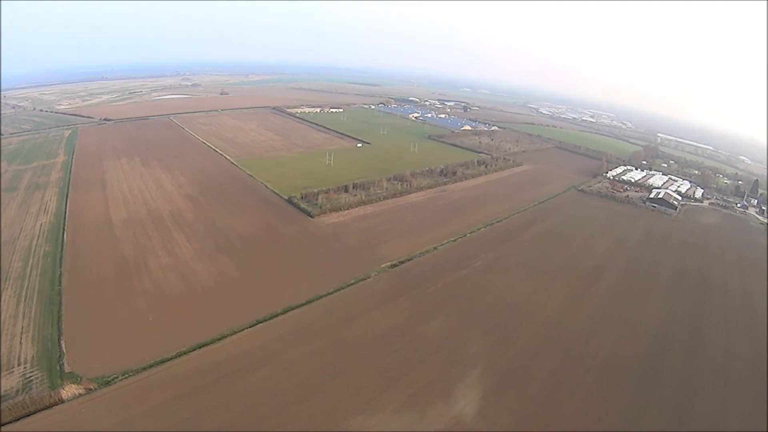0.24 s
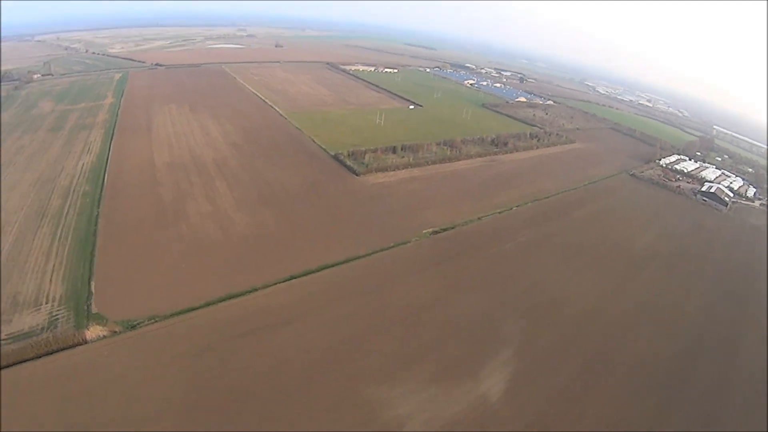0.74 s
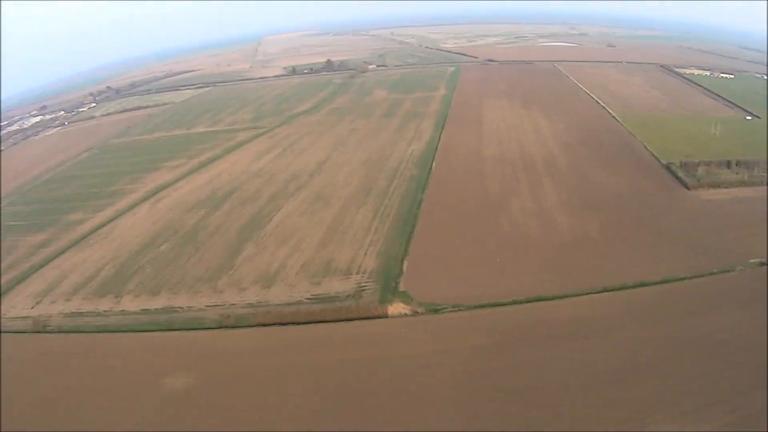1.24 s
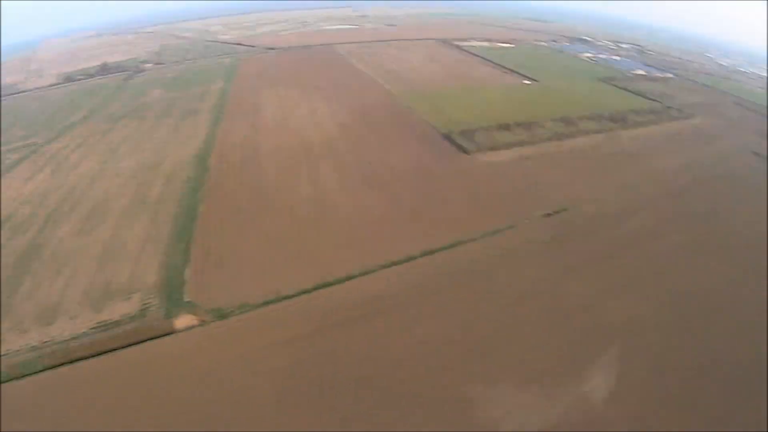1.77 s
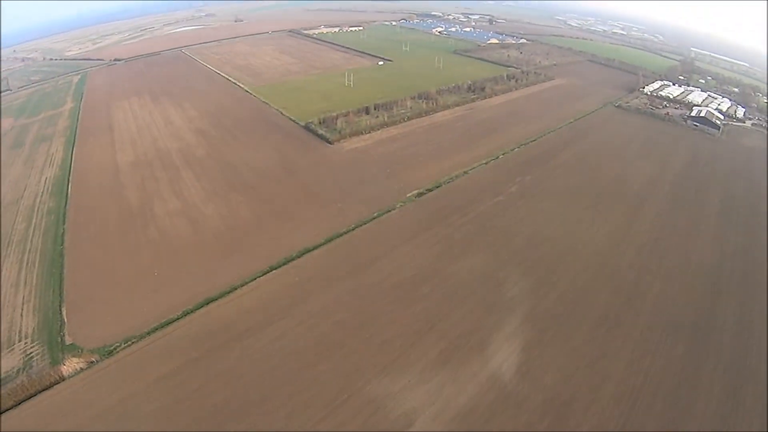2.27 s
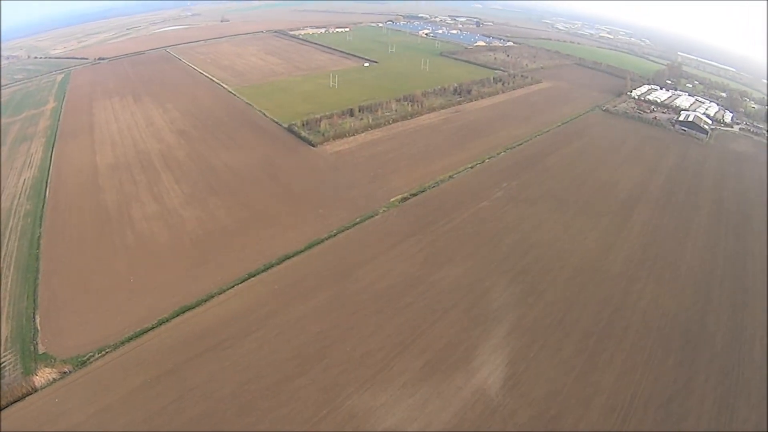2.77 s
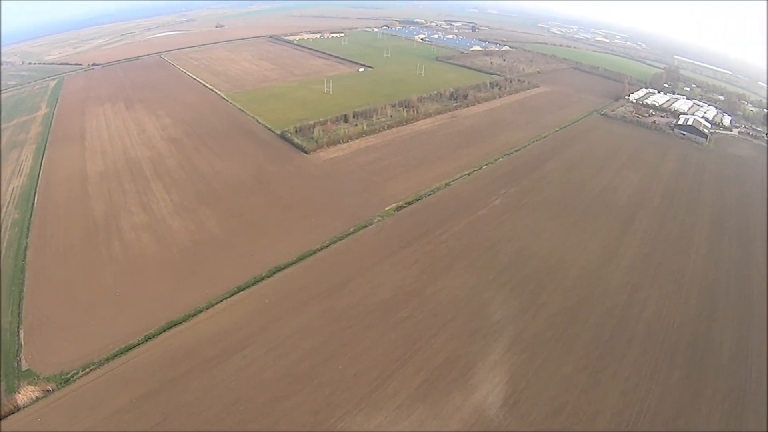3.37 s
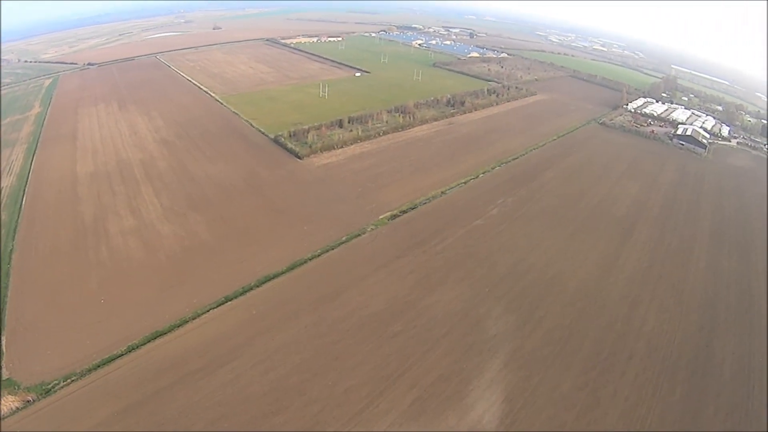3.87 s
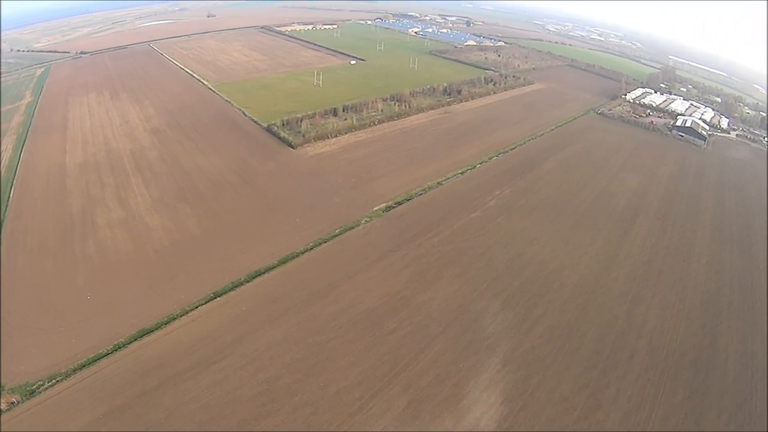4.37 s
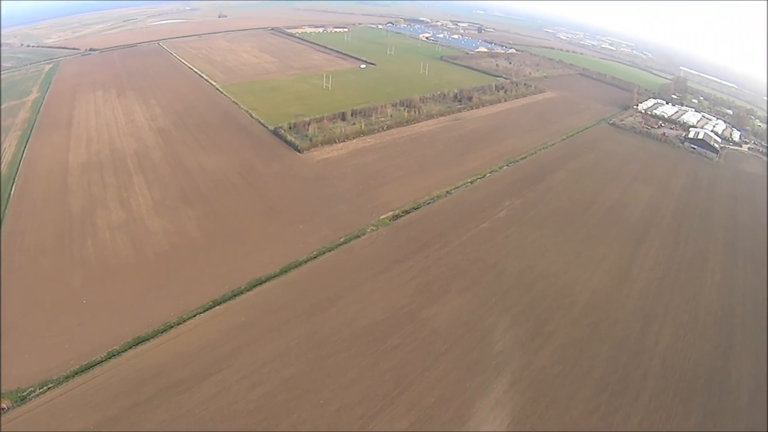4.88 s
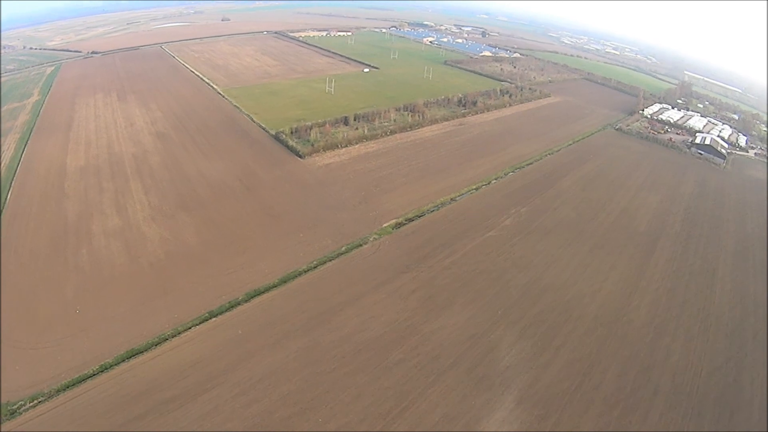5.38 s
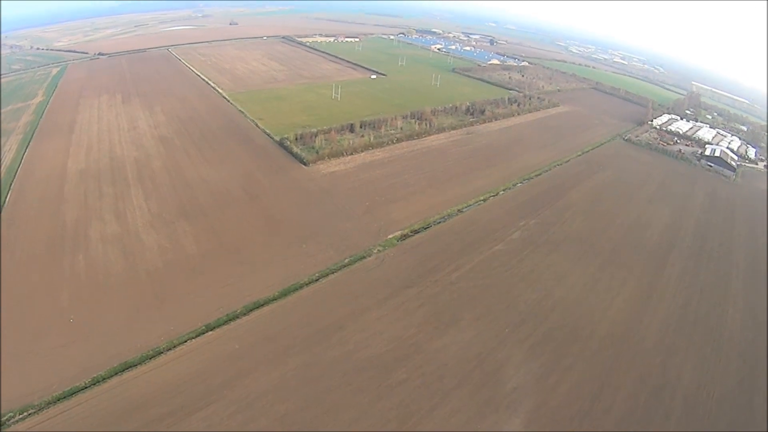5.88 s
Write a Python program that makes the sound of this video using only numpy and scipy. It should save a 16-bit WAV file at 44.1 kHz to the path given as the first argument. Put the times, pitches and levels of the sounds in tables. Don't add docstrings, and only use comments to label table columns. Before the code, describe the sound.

Continuous loud engine drone from an airborne paraglider, close and coloured by a sealed camera case, in wide stereo. Propeller blades chop the air rapidly into buzzing wash, midrange roar and a softer hiss. Early on, a quick head turn lets blade slap and airy hiss through, with humming wind thumps. Facing ahead again, the motor settles a touch lower and runs on without stopping.

```python
import sys
import numpy as np
from scipy import signal
from scipy.fft import rfft, irfft, next_fast_len
from scipy.io import wavfile
from scipy.ndimage import uniform_filter1d, map_coordinates

SR = 44100
rng = np.random.default_rng(int(sys.argv[2]) if len(sys.argv) > 2 else 0)


def invert_db(x):
    u = np.asarray(x, float) / 20
    return 10 ** u


def inscribe(sig):
    pcm = np.round(np.clip(np.atleast_2d(sig).T, -1, 1) * 32767)
    wavfile.write(sys.argv[1], SR, pcm.astype(np.int16))


N = 269892

# time_s, speed_turns_per_s
SHAFT_SPEED = [(0.0, 21.545), (0.4, 21.58), (0.8, 21.648), (1.0, 21.653), (1.2, 21.614), (1.9, 21.618),
               (2.2, 21.686), (2.4, 21.708), (2.8, 21.566), (3.2, 21.456), (3.4, 21.329), (4.0, 20.932),
               (4.2, 20.88), (4.6, 20.868), (5.6, 20.62), (5.8, 20.628), (6.2, 20.668)]
# pitch_hz, left_db,
# right_db, likeness_0_to_1 of the two sides, right_lead_radians
HOUSING_PASS_BELOW_1K = [(30, -68.5, -69, 0.85, 0.5), (70, -61, -60, 0.93, -0.0), (142, -54, -51.5, 0.89, 0.41),
                         (233, -58, -57.5, 0.59, 0.26), (334, -46.5, -52.5, 0.24, 2.5), (428, -54, -61.5, 0.76, -0.4),
                         (485.5, -61, -54.0, 0.33, 0.6), (552, -44, -45.5, 0.79, 0.2), (593, -48, -42.5, 0.78, 1),
                         (615, -49, -47, 0.81, 0.87), (693, -55.5, -46, 0.34, 1.1), (794, -60.5, -50.5, 0.5, -0.2),
                         (880, -58, -53, 0.77, -1.5), (978, -53, -47, 0.64, -0.8)]
HOUSING_PASS_1K_TO_3K = [(1014, -48.5, -55, 0.76, -2), (1140, -51, -49.5, 0.97, -1.5), (1290, -50, -48.5, 0.78, -2),
                         (1399, -56.5, -55, 0.31, 2.5), (1516, -42, -41, 0.84, 0.76), (1677, -44, -46.5, 0.94, -0.3),
                         (1735, -41, -43, 0.81, -0.46), (1847, -48.5, -50, 1, -1), (2085, -53.5, -73, 0.8, -1),
                         (2187, -55, -53, 0.23, -0.77), (2440, -56.5, -64.5, 0.21, -1.1),
                         (2570, -56.5, -70.5, 0.34, 4.5), (3030, -57, -56.5, 0.53, -2.5),
                         (3230, -56.5, -57.0, 0.27, -3)]
HOUSING_PASS_3K_TO_8K = [(3445, -61.5, -58, 0.52, 4), (3670, -67.5, -63.5, 0.6, 3.5), (3870, -66.5, -66.5, 0.69, 4),
                         (4340, -61, -63.5, 0.8, -3.5), (4740, -77, -68, 1, 0.4), (5064, -63.5, -60.5, 0.74, 1),
                         (5030, -72.5, -63, 0.97, 1), (5360, -62.5, -62.5, 0.96, -1), (5890, -74, -68.5, 0.2, 2),
                         (6060, -68.5, -68.5, 0.63, 0.6), (6680, -85, -73, 0.35, 0), (6800, -73, -69.5, 0.27, 1),
                         (7500, -71, -72, 0.33, -0.1), (8360, -79, -78, 0.14, 0.2)]
HOUSING_PASS_ABOVE_8K = [(8450, -76, -74, 0.13, -0.5), (8700, -79, -80.5, 0.29, 1.2), (9260, -76.5, -83, 0.25, 2),
                         (10030, -83.5, -90.5, 0.19, -1), (10320, -86, -81.5, 0.29, -0.8),
                         (10800, -89.5, -93.5, 0.13, -2), (11000, -100, -100.0, 0.09, -1)]
# order_per_shaft_turn, level_db over the noise
BLADE_TONES = [(1, 14), (2, 12.5), (4, 16.5), (6, 10.5), (8, 0.5), (10, 9), (12, 3.5), (14, 5), (16, 11),
               (18, 5.5), (20, -0.5), (22, 14.5), (24, 5.5), (26, 9.5), (28, 9.5), (30, 10), (32, 11),
               (34, 8), (36, 4)]
# order_per_crank_turn, level_db over the noise
CRANK_TONES = [(1, 11.5), (14, 6.5), (15, -0.5), (27, 6), (28, 8), (29, 9), (30, 6), (31, 5), (56, 7)]
# pitch_hz, width_hz, left_db, right_db over the range around
HOUSING_RINGS = [(346.3, 12, 3.5, 6), (574.4, 17.3, -2, 0), (1119, 19, 3.5, 1.5), (2410, 64, -1, 3),
                 (2948, 30, 2.5, 4), (3110, 30, 0.5, 5.5), (3140, 10, 2.5, 0.5), (3430, 19, -3, 3),
                 (4956, 40, 2.5, 2.5), (5030, 28, -4.5, 2.5)]
# time_s, level_db about its usual strength
AIRFLOW_LEVEL = [(0.2, 0.5), (0.8, 0.54), (2.2, 0), (2.5, 0.1), (3.07, -1.5), (3.8, -0.3), (4.35, 0.85),
                 (5.3, 0.3), (5.75, 0.8), (6.1, -0.5)]
# time_s, share_0_to_1
HEAD_TURN = [
    (0.9, 0.0),
    (1.1, 0.2),
    (1.4, 0.97),
    (1.75, 0.9),
    (1.98, 0.15),
    (2.15, 0.07),
]
# middle_s, length_s, level_db, pitch_hz
WIND_PUFFS = [
    (1.13, .08, -35, 172),
    (1.194, .04, -25, 173.8),
    (1.251, .06, -24.5, 212),
    (1.341, .11, -26.5, 190.3),
    (1.47, .1, -33.5, 172.2),
    (1.552, .03, -22, 164.9),
    (1.605, .02, -29, 178),
    (1.668, 0.041, -22.5, 154.7),
    (1.757, .04, -23, 180.9),
    (1.876, 0.071, -28, 201),
]


def unit(x):
    return x / np.sqrt(np.mean(x ** 2) + 1e-20)


def curves(rows):
    s, *cols = np.transpose(rows)
    return [np.interp(np.arange(N) / SR, s, c) for c in cols]


def wobble(rate, channels=1):
    knots = rng.standard_normal((channels, int(N * rate / SR) + 4))
    return np.array([map_coordinates(k, [np.arange(N) * rate / SR]) for k in knots])


def filtered(x, response):
    m = next_fast_len(N + 8192)
    return irfft(rfft(x, m) * response(np.fft.rfftfreq(m, 1 / SR)), m)[..., :N]


def turbulence(patchy_db):
    z = signal.stft(rng.standard_normal((3, N + 512)), nperseg=256)[2]
    field = rng.standard_normal(z.shape[1:])
    field = uniform_filter1d(field, size=4, axis=0)
    field = uniform_filter1d(field, size=12, axis=1)
    noise = signal.istft(z * invert_db(patchy_db * unit(field)), nperseg=256)[1]
    return unit(noise[:, :N])


def housing(drive, lo_hz, hi_hz):
    hz, left, right, alike, lead = np.transpose(HOUSING_PASS_BELOW_1K + HOUSING_PASS_1K_TO_3K + HOUSING_PASS_3K_TO_8K + HOUSING_PASS_ABOVE_8K)

    def response(f):
        read = lambda v: np.interp(np.log(f + 1), np.log(hz), v)
        low_edge = 1 + (lo_hz / (f + 1)) ** 12
        high_edge = 1 + (f / hi_hz) ** 12
        fade = np.sqrt(1 / low_edge / high_edge)
        ring = sum(invert_db([[l_db], [r_db]]) ** 2 / (1 + (2 * (f - c) / w) ** 2)
                   for c, w, l_db, r_db in HOUSING_RINGS)
        gl, gr = fade * invert_db([read(left), read(right)]) * np.sqrt(1 + ring)
        share = np.clip(read(alike), 0, 1)
        shift = np.exp(1j * read(np.unwrap(lead)))
        common, own = share ** .5, (1 - share) ** .5
        return np.array([gl * common, gr * common * shift, gl * own, gr * own])

    parts = filtered(drive[[0, 0, 1, 2]], response)
    return parts[:2] + parts[2:]


def chop(turns, sharp):
    bump = np.exp(sharp * np.cos(2 * np.pi * turns))
    return unit(bump - bump.mean())


def blades(shaft, angle, sharp):
    return chop(2 * (shaft - angle), sharp)


def spars(shaft, angle):
    return chop(4 * (shaft - angle), sharp=0.3)


def firing(shaft, angle):
    return chop(2.7 * shaft - angle, sharp=1.0)


def uneven(shaft):
    return chop(shaft - .08, sharp=0.96)


def follow(flow_db, turn, per_db, turned_db):
    return per_db * flow_db + turned_db * turn


def steady(flow_db, turn, per_db, turned_db):
    level = follow(flow_db, turn, per_db, turned_db)
    return invert_db(level - level.mean())


def tones(turns, orders, waver_db, slip):
    out = np.zeros(N)
    for k, db in orders:
        sway, drift = wobble(1.5, channels=2)
        angle = 2 * np.pi * (k * turns + rng.random()) + slip * drift
        out += invert_db(db + waver_db * sway) * np.sin(angle)
    return out * np.sqrt(8 / SR)


def motor_tones(shaft, flow_db, turn):
    blade_db = -0.4 + follow(flow_db, turn, per_db=1.5, turned_db=-1.2)
    crank_db = 1.1 + follow(flow_db, turn, per_db=0.3, turned_db=5.2)
    lines = invert_db(blade_db) * tones(shaft, BLADE_TONES, waver_db=1.0, slip=0.46)
    lines += invert_db(crank_db) * tones(2.7 * shaft, CRANK_TONES, waver_db=1.5, slip=0.62)
    return [[1], [0], [0]] * lines


def propeller_wash(shaft, flow_db, turn, lines):
    throb_db = 1.1 * blades(shaft, 0.1, sharp=1.7) + 0.27 * wobble(9)
    wash = turbulence(patchy_db=0.47) * invert_db(throb_db)
    gain = steady(flow_db, turn, per_db=0.69, turned_db=-0.25)
    return gain * housing(unit(wash) + lines, lo_hz=18, hi_hz=490)


def shell_drumming(shaft, lines):
    throb_db = 2.3 * spars(shaft, 0.18) + 1.4 * blades(shaft, 0.46, sharp=1.2)
    drum = turbulence(patchy_db=0.36) * invert_db(throb_db)
    return housing(unit(drum) + lines, lo_hz=490, hi_hz=1050)


def exhaust_roar(shaft, lines):
    throb_db = 1.07 * blades(shaft, 0.453, sharp=2.4) + 0.4 * spars(shaft, 0.15) + 0.49 * firing(shaft, 0.045)
    exhaust = turbulence(patchy_db=1.03) * invert_db(throb_db)
    return housing(unit(exhaust) + lines, lo_hz=1050, hi_hz=2100)


def frame_rattle(shaft, flow_db, turn, lines):
    throb_db = 0.51 * blades(shaft, 0.072, sharp=1.2) + 1.0 * spars(shaft, 0.21)
    throb_db = throb_db + 1.2 * firing(shaft, 0.41) + 1.04 * wobble(25)
    rattle = turbulence(patchy_db=1.0) * invert_db(throb_db)
    gain = steady(flow_db, turn, per_db=0.9, turned_db=1.1)
    return gain * housing(unit(rattle) + lines, lo_hz=2100, hi_hz=4600)


def blade_bite(turn):
    return 0.37 + 0.24 * turn


def port_hiss(shaft, flow_db, turn):
    throb_db = 2.1 * blade_bite(turn) * blades(shaft, 0.19, sharp=0.65)
    throb_db = throb_db + 0.84 * firing(shaft, .4) + 1.54 * wobble(30)
    port = turbulence(patchy_db=0.5) * invert_db(throb_db)
    gain = steady(flow_db, turn, per_db=1.1, turned_db=-3)
    return gain * housing(unit(port), lo_hz=4600, hi_hz=6500)


def tip_swish(shaft, flow_db, turn):
    cut = blades(shaft, 0.052, sharp=0.94) + 0.43 * uneven(shaft)
    throb_db = 6.0 * blade_bite(turn) * cut + 0.34 * firing(shaft, 0.4) + 0.99 * wobble(30)
    tips = turbulence(patchy_db=1.8) * invert_db(throb_db)
    gain = steady(flow_db, turn, per_db=0.6, turned_db=4.1)
    return gain * housing(unit(tips), lo_hz=6500, hi_hz=8600)


def shoulder_slap(shaft, turn):
    slap = turbulence(patchy_db=1.4) * invert_db(1.6 * blades(shaft, 0.19, sharp=1.2))
    opening = invert_db(2.5) * turn ** 2.6
    return opening * housing(unit(slap), lo_hz=3400, hi_hz=3830)


def fine_air(shaft):
    drive = turbulence(patchy_db=2.2) * invert_db(.7 * uneven(shaft))
    return housing(drive, lo_hz=8600, hi_hz=12000)


def motor():
    shaft = np.cumsum(curves(SHAFT_SPEED)[0]) / SR
    flow_db = curves(AIRFLOW_LEVEL)[0]
    turn = np.clip(curves(HEAD_TURN)[0], 0, 1)
    lines = motor_tones(shaft, flow_db, turn)
    mix = propeller_wash(shaft, flow_db, turn, lines)
    mix += shell_drumming(shaft, lines)
    mix += exhaust_roar(shaft, lines)
    mix += frame_rattle(shaft, flow_db, turn, lines)
    mix += port_hiss(shaft, flow_db, turn)
    mix += tip_swish(shaft, flow_db, turn)
    mix += shoulder_slap(shaft, turn)
    mix += fine_air(shaft)
    return invert_db(42.5) * mix


def buffet():
    middle, length, db, hz = np.transpose(WIND_PUFFS)
    s = np.arange(N) / SR
    edge_s = 0.01
    inside = (length[:, None] / 2 - np.abs(s - middle[:, None])) / edge_s
    power = (invert_db(db)[:, None] * (1 + np.tanh(inside)) / 2) ** 2 + 1e-12
    total = power.sum(axis=0)
    pitch = hz @ power / total
    turns = np.cumsum(pitch * (1 + 0.06 * wobble(45)[0])) / SR
    hum = np.sqrt(2) * np.sin(2 * np.pi * turns + 0.4 * wobble(28, channels=2))
    band = lambda f: 1j * f * 190 / (170 ** 2 - f * f + 1j * f * 190)
    shared, left, right = unit(filtered(rng.standard_normal((3, N)), lambda f: band(f) ** 2))
    lumps = invert_db(-5.5) * (shared + 0.75 * np.array([left, right]))
    return np.sqrt(total) * (hum + lumps) * invert_db([[-.6], [.6]])


def scene():
    return motor() + buffet()


def roll_off(x):
    return signal.sosfilt(signal.butter(12, 10900, fs=SR, output="sos"), x)


def record(dry):
    power = np.abs(uniform_filter1d(np.mean(dry ** 2, axis=0), size=6000))
    even = dry * (power / power.mean()) ** -.15
    soft = even / (1 + np.abs(even / .98) ** 4) ** (1 / 4)
    return roll_off(soft)


dry = scene()
out = record(dry)
inscribe(out)
```